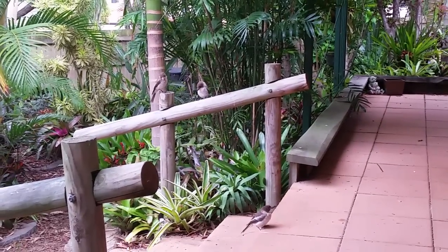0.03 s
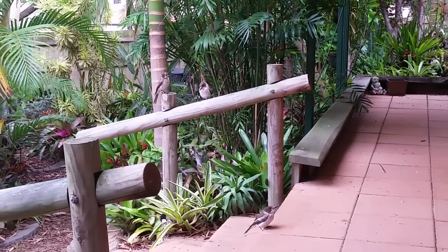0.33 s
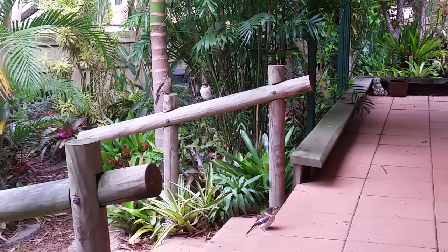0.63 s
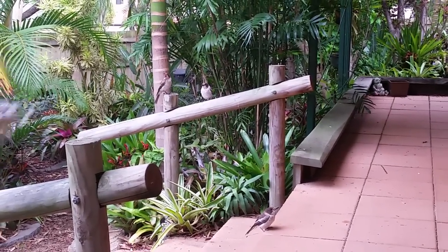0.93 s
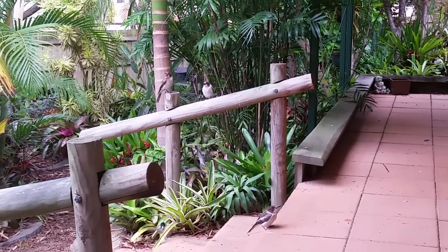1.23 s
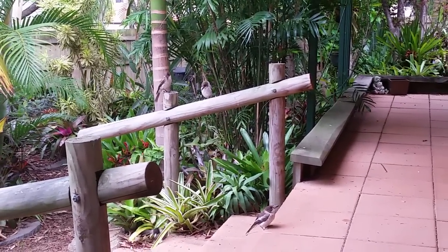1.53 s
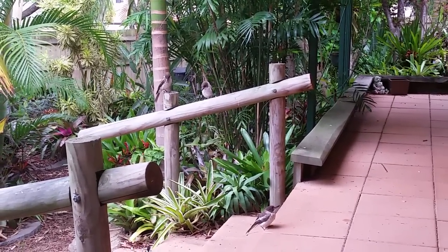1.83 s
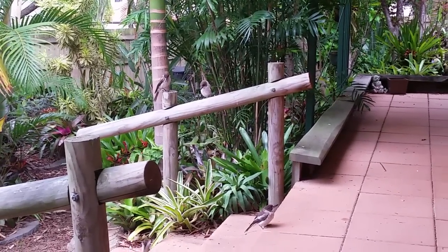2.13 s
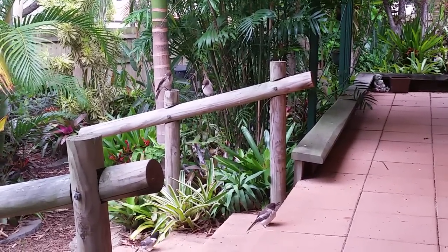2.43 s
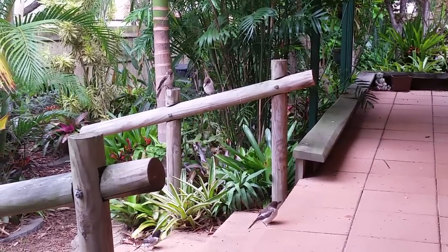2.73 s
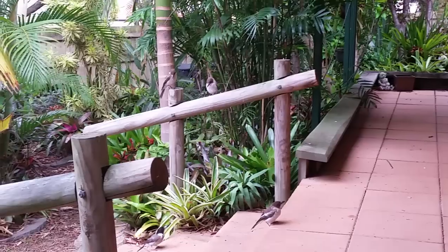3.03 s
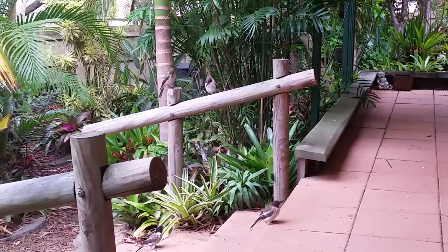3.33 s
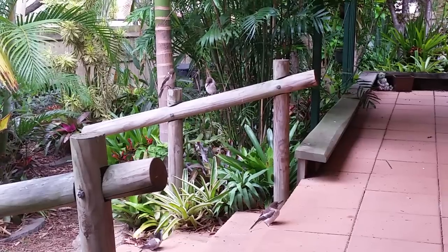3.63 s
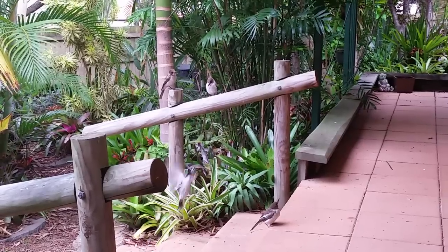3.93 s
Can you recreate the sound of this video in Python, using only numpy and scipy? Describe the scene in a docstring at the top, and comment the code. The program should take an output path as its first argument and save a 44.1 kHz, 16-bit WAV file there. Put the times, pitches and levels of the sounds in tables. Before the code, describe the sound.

Harsh, rising begging calls from young birds repeat steadily in a garden, bright and duller voices overlapping a few metres from the microphone. A faint low rumble and soft hiss lie underneath.

```python
"""Nasal whines that rise and break into a rasp: young birds begging in a garden a few metres away.
Duller rising voices overlap the bright ones. Each voice is a syrinx whose clear upper harmonics
give way to chaotic ones and a pulsed hiss, shaped by throat and beak. Paving and plants scatter
the calls over a faint low rumble and soft hiss. One faint low note sounds from afar."""
import sys
import numpy as np
from scipy import signal
from scipy.fft import rfft, irfft
from scipy.io import wavfile
from scipy.ndimage import uniform_filter1d, map_coordinates

SR = 44100
rng = np.random.default_rng(int(sys.argv[2]) if len(sys.argv) > 2 else 0)


def waveform_to_disk(signal):
    """Save audio, clipped to [-1, 1], as 16-bit WAV at the path in sys.argv[1]."""
    frames = np.transpose(np.atleast_2d(signal))
    scaled = np.clip(frames, -1, 1) * 32767
    samples = np.round(scaled).astype(np.int16)
    wavfile.write(sys.argv[1], SR, samples)


N = 176400
T = np.arange(N) / SR
TOP_HZ = 14700
ATTACK_S, RELEASE_S = .014, .016


def undb(db):
    """Decibels to gain."""
    return 10 ** (np.asarray(db) / 20)


def unit(x):
    """Scale to rms 1."""
    return x / np.sqrt(np.mean(x ** 2))


def gain_at(hz, points):
    """Gain of a (freq_hz, gain_db) curve."""
    freq_hz, gain_db = np.array(points, float).T
    return undb(np.interp(np.log(hz + 1), np.log(freq_hz), gain_db))


def colour(x, points):
    """Filter by a (freq_hz, gain_db) curve."""
    n = x.shape[-1]
    return irfft(rfft(x) * gain_at(np.fft.rfftfreq(n, 1 / SR), points), n)


def noise(points):
    """Coloured noise, rms 1."""
    return unit(colour(rng.standard_normal(N), points))


def wobble(t, rate_hz):
    """Smooth random wander, spread about 1."""
    knots = np.random.default_rng(rng.integers(2 ** 31)).standard_normal(4096)
    return map_coordinates(knots, [(t - t[0]) * rate_hz], order=3, mode="wrap")


def delay(x, lag_s):
    """Fractional-sample delay."""
    return irfft(rfft(x, 2 * N) * np.exp(-2j * np.pi * lag_s * np.fft.rfftfreq(2 * N, 1 / SR)))[:N]


def gate(start_s, end_s):
    """Sample mask and attack-release envelope of one call."""
    corners_s = [start_s - ATTACK_S / 2, start_s + ATTACK_S / 2, end_s, end_s + RELEASE_S]
    on = (T > corners_s[0]) & (T < corners_s[-1])
    return on, np.interp(T[on], corners_s, [0, 1, 1, 0])


# Throat and beak resonances: freq_hz, gain_db
THROAT = [(2500,13),(3550,-3),(4250,1.5),(5000,5.5),(6000,6.5),(7000,10),(7800,3.5),(8800,11.5),(10500,3),(12200,7),(14500,-6.5)]
# Harmonics 3 to 7, last value held above: gain_db
HARMONIC_DB = [5, 6, 1.5, 4, 4.5]


def throat_harmonics(phase, hz):
    """Harmonics 3 to 16 shaped by the throat, rms 1."""
    k = np.arange(3, 17)[:, None]
    source = undb(np.interp(k, k[:len(HARMONIC_DB), 0], HARMONIC_DB))
    weights = gain_at(k * hz, THROAT) * source * (k * hz < TOP_HZ)
    partials = weights * np.sin(k * phase + rng.uniform(0, 2 * np.pi, k.shape))
    return partials.sum(0) / np.sqrt((weights ** 2).sum(0) / 2)


# Beak filter bands: freq_hz
BEAK_HZ = [3600, 5800, 8900, 12600]


def syrinx(t, hz, rough, first_gain, second_gain, treble_gain, beak_db=(0, 0, 0, 0)):
    """Bird voice: with roughness, clear upper harmonics give way to chaotic ones and a pulsed hiss."""
    jitter, rasp_jitter, waver = .012, .065, .00424  # fractions of pitch
    jitter_hz, hiss_db, shimmer_db = 900, -2, 3.5
    rough = np.clip(rough, 0, .98)
    hz = hz * (1 + jitter * rough * wobble(t, jitter_hz) + waver * wobble(t, rate_hz=58.54))
    phase = 2 * np.pi * np.cumsum(hz) / SR
    chaotic_phase = 2 * np.pi * np.cumsum(hz * (1 + rasp_jitter * wobble(t, jitter_hz))) / SR
    puffs = rng.standard_normal(N)[:len(t)] * (1 + np.cos(phase))
    hiss = unit(colour(puffs, [(1200, -30), (3000, -12), (5500, -16), (9000, -2), (14000, -18)]))
    shaken_phase = phase + .36 * rough * wobble(t, rate_hz=260.7)
    low = first_gain * np.sin(shaken_phase) + second_gain * np.sin(2 * shaken_phase)
    clear = throat_harmonics(phase, hz)
    rasp = unit(throat_harmonics(chaotic_phase, hz) + undb(hiss_db) * hiss)
    upper = np.sqrt(1 - rough ** 3) * clear + np.sqrt(rough ** 3) * rasp
    upper = colour(upper, list(zip(BEAK_HZ, beak_db)))
    shimmer = undb(shimmer_db * rough * wobble(t, rate_hz=297.9))
    return (np.sqrt(2) * low + treble_gain * upper) * shimmer


# Contours, one list per call: time_s, pitch_hz, low_harmonics_db, treble_db
BRIGHT_CALLS = [
    [(0.0, 1302, -26, -26.5), (0.012, 1359, -30.5, -34.5), (0.028, 1429, -37.5, -33),
     (0.054, 1523, -34, -39.5), (0.065, 1555, -47.5, -47)],
    [(0.25, 1124, -41.5, -57), (0.274, 1210, -41.5, -45), (0.325, 1200, -40.5, -42),
     (0.385, 1260, -39, -40), (0.462, 1419, -35, -35), (0.5, 1454, -41, -43.5)],
    [(0.672, 1116, -42.5, -50), (0.692, 1167, -40.5, -40.5), (0.73, 1160, -40, -37.5),
     (0.816, 1287, -36.5, -36.5), (0.865, 1505, -38, -31), (0.908, 1726, -35, -30),
     (0.925, 1750, -32.5, -37.5)],
    [(1.085, 1178, -39, -41), (1.093, 1206, -45.5, -41.5), (1.149, 1206, -37, -41.5),
     (1.207, 1250, -40.5, -37.5), (1.247, 1331, -37.5, -42.5), (1.27, 1292, -40, -42)],
    [(1.428, 1093, -36.5, -46), (1.444, 1145, -39.5, -42.5), (1.472, 1157, -40.5, -38),
     (1.525, 1148, -38, -35), (1.606, 1266, -40, -34.5), (1.635, 1283, -38.5, -38)],
    [(1.725, 1083, -38, -53), (1.737, 1118, -36.5, -43), (1.793, 1150, -42, -37.5),
     (1.845, 1218, -43.5, -35.5), (1.887, 1387, -37, -30), (1.92, 1437, -45, -41)],
    [(2.178, 1048, -40.5, -45.5), (2.2, 1134, -37, -42), (2.292, 1183, -44, -36.5),
     (2.34, 1246, -40.5, -37.5), (2.394, 1409, -39, -31), (2.435, 1483, -43, -35)],
    [(2.558, 1250, -50, -36), (2.57, 1243, -36, -37), (2.626, 1190, -35.5, -35), (2.684, 1317, -28.5, -30),
     (2.73, 1482, -30.5, -27), (2.757, 1507, -43, -36)],
    [(2.922, 1245, -38.5, -37.5), (2.94, 1257, -48.5, -36.5), (2.986, 1258, -32.5, -37.5),
     (3.07, 1467, -30, -34), (3.096, 1558, -30, -34), (3.135, 1537, -44, -44)],
    [(3.37, 1291, -45, -54), (3.404, 1190, -50, -53), (3.414, 1122, -38, -53), (3.462, 1148, -35.5, -46.5),
     (3.568, 1283, -42.5, -42), (3.61, 1344, -34.5, -46.5)],
    [(3.803, 1103, -39.5, -54), (3.827, 1181, -48, -46), (3.857, 1189, -40.5, -39.5),
     (3.895, 1196, -48, -42), (3.953, 1332, -40.5, -36.5), (4.0, 1367, -38, -41)],
]
# Timbre per call: rough_start_frac, rough_end_frac, first_harmonic_db, second_harmonic_db, drop_frac
BRIGHT_TIMBRE = [(0.18,1,-6.5,-9,0.03),(0.02,0.47,-5,-6.5,0),(0.08,0.68,-5,-7,0.06),(0.25,0.5,-8.5,-6.5,0.2),(0.27,0.13,-5,-7,0.08),(0.33,0,-1,-4.5,0.92),(0.03,0,0,-4.5,0.2),(0.41,0.7,-7,-10.5,.05),(0.35,0.92,-9.5,-12,0.6),(0.63,0.4,-7.5,-8.5,0.14),(0.2,0.06,-1,-1.5,.02)]
# Open beak per call: gain_db at each BEAK_HZ
BRIGHT_BEAK = [(7, -8, 0.5, -3), (2, 1, -2, 2.5), (2, 5.5, -0.5, 2), (-1, 6.5, -1, 0.5),
               (-1.5, 0.5, -1.5, -4), (-2, 1, 2.5, -2.5), (-3.5, 0.5, -1.5, -2.5), (-2, 3, -0.5, -4),
               (1.5, 3.5, -5, -1), (10, -2.5, 3, 4), (2, -1.5, 0, -0.5)]


def bright_calls():
    """Nasal rising calls, each with its own roughness curve; most flick down as they stop."""
    out = np.zeros(N)
    for contour, timbre, beak_db in zip(BRIGHT_CALLS, BRIGHT_TIMBRE, BRIGHT_BEAK):
        rough_start, rough_end, first_db, second_db, drop_frac = timbre
        time_s, *columns = np.array(contour, float).T
        on, envelope = gate(time_s[0], time_s[-1])
        t = T[on]
        hz, low_db, treble_db = (np.interp(t, time_s, column) for column in columns)
        closing_drop = 1 - drop_frac * np.maximum(t - time_s[-1], 0) / RELEASE_S
        hz = uniform_filter1d(hz, size=600, mode="nearest") * closing_drop
        rough = rough_start + (rough_end - rough_start) * np.sin(np.linspace(0, np.pi / 2, len(t))) ** 3
        first_gain = undb(low_db + first_db - .5)
        second_gain = undb(low_db + second_db + 1.5)
        out[on] += envelope * syrinx(t, hz, rough, first_gain, second_gain, undb(treble_db + 1), beak_db)
    return out


# Glides: start_s, end_s, from_hz, to_hz, droop_hz, rise_exponent, start_db, end_db, second_db, treble_db
DULL_CALLS = [ (0.0, 0.081, 1250, 1545, 6, 1.35, -45, -69, -6, -5),
              (0.326, 0.612, 899.5, 1612, -76.5, 1.82, -47, -38.5, -10, -4),
              (0.327, 0.614, 1066, 1535, 37.5, 1.6, -46.5, -47, -13.5, 12.5),
              (0.779, 0.931, 1095, 1487, 86.5, 1.78, -47, -40, -6.5, 17.5),
              (1.299, 1.396, 1003, 950, -3, 1.4, -65.5, -64.5, 8, 13),
              (1.622, 1.916, 968, 1714, -1, 1.43, -46.5, -42.5, -12, 9),
              (2.407, 2.67, 971, 1397, 8, 1.48, -47, -43, -9.5, 9),
              (2.493, 2.766, 921.6, 1685, -1, 1.53, -46, -40, -5.5, 5),
              (2.929, 3.185, 1048, 1561, 180.5, 1.5, -41, -42.5, -12, 1),
              (3.341, 3.54, 1025, 1347, 77, 1.58, -40, -42, -12.5, 0.5),
              (3.408, 3.515, 1207, 1527, -0.5, 1.56, -45, -46, -18, 16),
              (3.878, 4.076, 1135, 1410, 1.5, 1.3, -46.5, -51, -5, 16),
              (3.903, 4.186, 831, 1600, -1, 1.36, -43.5, -37, -10, -12)]


def dull_calls():
    """Calls mostly led by the fundamental: the pitch settles briefly, then glides in an S."""
    hold_frac, droop_s = .04, .03
    rough_start, rough_peak = .15, .62
    out = np.zeros(N)
    for start_s, end_s, from_hz, to_hz, droop_hz, rise_exponent, *levels_db in DULL_CALLS:
        start_db, end_db, second_db, treble_db = levels_db
        on, envelope = gate(start_s, end_s)
        age_s = np.maximum(T[on] - start_s, 0)
        progress = np.clip((age_s / (end_s - start_s) - hold_frac) / (1 - hold_frac), 0, 1)
        late = progress ** rise_exponent
        glide = .6 * np.sin(np.pi / 2 * late) ** 2 + .4 * late
        hz = from_hz + (to_hz - from_hz) * glide + droop_hz * np.exp(-age_s / droop_s)
        gain = envelope * undb(start_db + (end_db - start_db) * progress)
        rough = rough_start + (rough_peak - rough_start) * np.sin(np.pi * .7 * progress)
        treble_gain = undb(treble_db - 16 + 6.4 * progress)
        out[on] += gain * syrinx(T[on], hz, rough, 1, undb(second_db + 1.5), treble_gain)
    return out


def scatter(t60_s, points):
    """Impulse response of a dying cloud of reflections, different at each ear."""
    t = T[:SR]
    cloud = rng.standard_normal((2, SR)) * undb(-60 * t / t60_s) * (1 - np.exp(-t / .00098))
    cloud /= np.sqrt((cloud ** 2).sum(1, keepdims=True))
    return colour(cloud, points)[:, :SR // 2]


# Echoes from paving and posts: left_delay_s, right_delay_s, gain
ECHOES = [(.00062,0.0013,0.14),(.0023,0.0014,0.27),(.0051,0.0067,0.41)]
# Phase between the ears due to reflections, one table per perch: freq_hz, left_lead_rad
BRIGHT_PERCH = [(900, 1.5), (1100, 1), (1270, 1), (1600, 0.2), (2000, 0)]
DULL_PERCH = [(950, 1), (1150, -1.2), (1350, -1.55), (1650, -0.12), (2000, 0.45)]


def garden(x, perch):
    """Direct sound, near echoes, scatter from leaves and a short tail; louder on the right."""
    near = np.array([x, delay(x, lag_s=.000029)])
    for left_s, right_s, gain in ECHOES:
        near += gain * np.array([delay(x, left_s), delay(x, right_s)])
    left_lead_rad = np.interp(np.fft.rfftfreq(N, 1 / SR), *np.array(perch, float).T)
    near[0] = irfft(rfft(near[0]) * np.exp(1j * left_lead_rad), N)
    leaves = scatter(t60_s=.029, points=[(1500, -5), (5000, -.5), (12000, -5)])
    tail = scatter(t60_s=.27, points=[(1400, -1.5), (2600, 0), (5000, 0), (7000, -3)])
    left, right = near + signal.fftconvolve(x[None], leaves + tail, axes=1)[:, :N]
    left = colour(left, [(1000, -2.8), (2300, .56), (4500, -8.5), (7000, -2), (10000, -.85)])
    return np.array([left, right])


# Rumble and hiss spectra: freq_hz, density_db
RUMBLE = [(20,-17),(40,-19.5),(58,-5.5),(72,-7.5),(88,-1),(105,-4),(135,-14),(200,-17),(400,-80)]
AIR = [(150,2),(250,3),(500,-4.5),(800,-7),(1100,-13),(1700,-13),(2400,-16),(3100,-23.5),(3900,-11),(4900,-28.5),(6300,-27),(9000,-25),(14500,-32)]


def background():
    """Distant rumble, alike in both ears, under a wide soft hiss."""
    rumble_db, rumble_side_db, air_db = -44.5, -16.5, -49.5
    sides = np.array([[1], [-1]])
    rumble = noise(RUMBLE) + undb(rumble_side_db) * sides * noise(RUMBLE)
    air_shape = [(60, -59)] + list(AIR)
    air_mid = noise(air_shape)
    air_side = colour(noise(air_shape), [(200, -11.5), (600, -3.5), (2000, 1.5)])
    return undb(rumble_db) * rumble + undb(air_db) * (air_mid + sides * air_side)


def far_whistle():
    """One faint low note that swells and fades, towards the right."""
    start_s, end_s, pitch_hz, level_db = .38, .533, 635, -49.5
    swell = np.sin(np.pi * np.clip((T - start_s) / (end_s - start_s), 0, 1))
    phase = 2 * np.pi * np.cumsum(pitch_hz * (1 + .0068 * wobble(T, rate_hz=26))) / SR
    return undb(level_db) * np.sqrt(2) * swell * np.sin(phase) * np.array([[.5], [1]])


def scene():
    """Birds on two perches, the far note and the background, in stereo."""
    birds = garden(bright_calls(), BRIGHT_PERCH) + garden(dull_calls(), DULL_PERCH)
    return birds + far_whistle() + background()


def record(dry):
    """Steep low-pass at TOP_HZ."""
    return signal.sosfilt(signal.ellip(10, .2, 80, TOP_HZ, fs=SR, output="sos"), dry)


dry = scene()
out = record(dry)
waveform_to_disk(out)
```